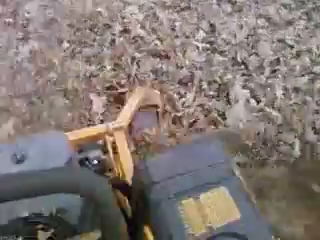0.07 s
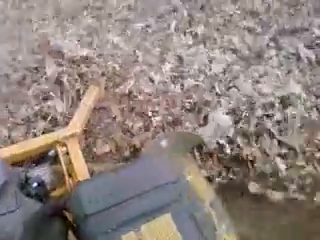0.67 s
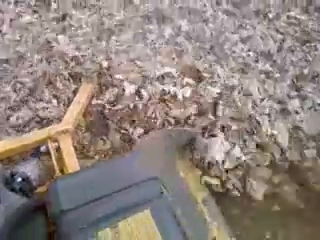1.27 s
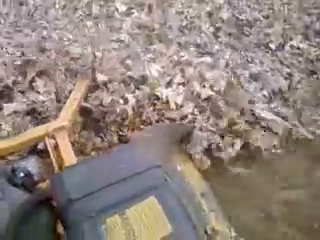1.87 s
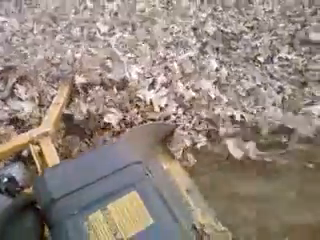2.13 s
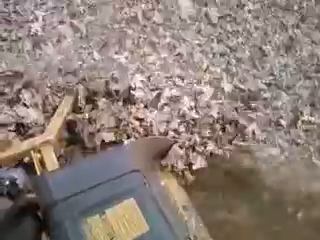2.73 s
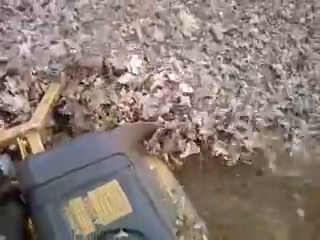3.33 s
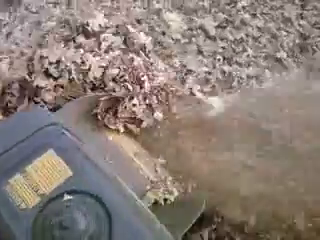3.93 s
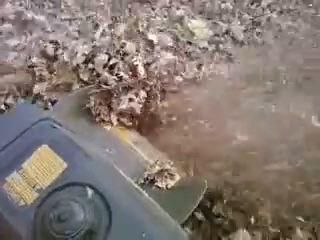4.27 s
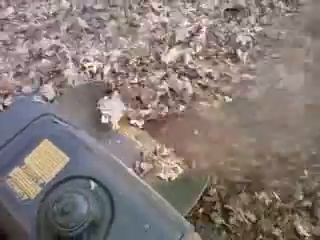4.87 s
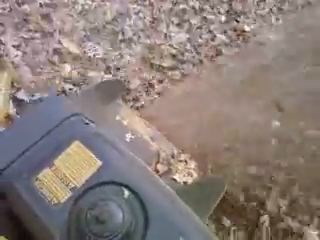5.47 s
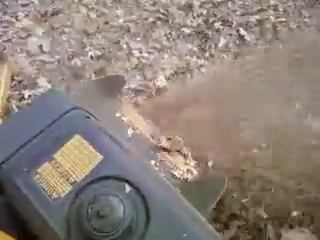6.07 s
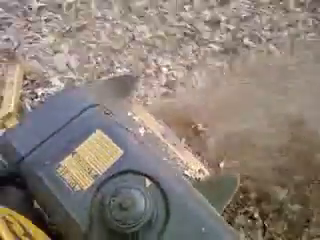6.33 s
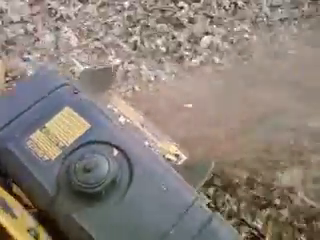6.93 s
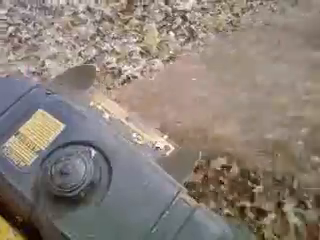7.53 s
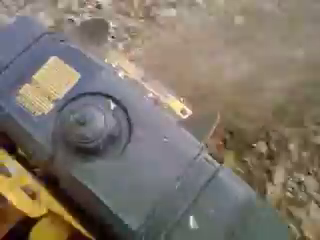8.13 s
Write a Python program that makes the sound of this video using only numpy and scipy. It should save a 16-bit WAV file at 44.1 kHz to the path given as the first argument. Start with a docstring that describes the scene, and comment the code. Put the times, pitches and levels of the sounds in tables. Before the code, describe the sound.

A ride-on mower drones loudly from start to finish, about eight seconds, heard outdoors from the seat. The engine holds an almost constant speed, its throbbing exhaust beating against the low hum of the blades, which slowly swells and fades. A faint, thin fan whine sits above. Air churns under the cutting deck, growing slightly stronger toward the end. Throughout, dry leaves shred in a dense rasp, with a fine rattle of small bits against steel. Twigs give short cracks at irregular moments, clearest near 0.4, 1.8, 3.6, 5.5, 5.9, 6.8 and 7.5 seconds. Light wind puffs rumble faintly on the microphone around 4.5, 7 and 7.8 seconds. The whole sound is close, compressed and a little distorted, with the highest treble missing.

```python
"""A ride-on mower, heard from the seat, drives its three belt-driven blades through dry leaves.
The blades hum at harmonics of their passing rate, beat against the V-twin's exhaust and churn the air.
Torn leaves rasp, twigs and small bits strike the steel deck, a fan whines and a light wind buffets.
The microphone passes only a narrow speech band, and the drone overloads it on nearly every swing."""
import sys
import numpy as np
from scipy import signal
from scipy.fft import rfft, irfft, next_fast_len
from scipy.io import wavfile

SR = 44100
rng = np.random.default_rng(int(sys.argv[2]) if len(sys.argv) > 2 else 0)


def transcribe(u):
    """Save the signal u as a 16-bit wav file named by the first command-line argument.

    u: samples, shape (n,) or (channels, n), limited to [-1, 1]; the rate is SR.
    q: integer samples, one column per channel.
    """
    v = np.clip(np.atleast_2d(u).T, -1, 1)
    q = np.round(v * 32767).astype(np.int16)
    wavfile.write(sys.argv[1], SR, q)


N = 362061
TIME = np.arange(N) / SR

# flow of leaves through the deck: t/s, relative level/dB
LEAF_FLOW = [(0.0, -19.5), (0.48, -21.5), (0.68, -17.2), (0.88, -20), (1.75, -18.5), (1.92, -17.5),
             (2.5, -19.5), (2.95, -20.5), (3.35, -18.5), (3.6, -19.5), (4.3, -20), (5.35, -19.7),
             (5.55, -19), (6.12, -19.5), (6.42, -20.5), (6.72, -20), (7.25, -21.5), (7.85, -20.5)]


def amp(db):
    """Amplitude ratio of a level in decibels."""
    return 10 ** (np.asarray(db) / 20)


def unit(x):
    """Normalisation to rms 1."""
    return x / np.sqrt(np.mean(x ** 2) + 1e-20)


def curves(rows):
    """Linear interpolation of each column of a timed table, at every sample."""
    s, *columns = np.transpose(rows)
    return [np.interp(TIME, s, column) for column in columns]


def colour(x, spectrum):
    """Filtering in the frequency domain by a table of f/Hz, gain/dB."""
    hz, db = np.transpose(spectrum)
    size = next_fast_len(N + SR // 10)
    bins = np.fft.rfftfreq(size, 1 / SR)
    gain = amp(np.interp(np.log(bins + 1), np.log(hz + 1), db))
    return irfft(rfft(x, size) * gain, size)[:N]


def wander(cutoff_hz):
    """Slow random fluctuation: low-passed noise of rms 1."""
    size = next_fast_len(N)
    bins = np.fft.rfftfreq(size, 1 / SR)
    spectrum = rfft(rng.standard_normal(size)) / np.sqrt(1 + (bins / cutoff_hz) ** 4)
    return unit(irfft(spectrum, size)[:N])


def tone(cycles, db):
    """A sinusoid of given rms level that follows a rotation, from a random starting phase."""
    return np.sqrt(2) * amp(db) * np.sin(2 * np.pi * (cycles + rng.random()))


def blades(passes, smear_passes=0.028, eddy_hz=14, third_flutter=0.36):
    """Interference: three blades sweep the deck wall; their hum swells and fades as the spindles slip."""
    # lead over the main spindle from belt slip: t/s, second spindle/passes, third spindle/passes
    belt_slip = [(0.0, -0.9, 0.44), (0.9, -0.91, 0.29), (1.8, -0.685, 0.45), (2.7, -0.15, 0.23),
                 (3.6, 0.06, 0.29), (4.6, 0.185, 0.38), (5.5, 0.61, 0.4), (6.4, 0.955, 0.28),
                 (7.3, 0.94, 0.32), (8.2, 1.49, 0.36)]
    # relative amplitude at the seat: main, second, third spindle
    spindle_gains = (0.99, 0.33, 0.55)
    # hum of one blade: harmonic of the passing rate, level/dB, flutter depth
    hum_harmonics = [(1, -11.5, 0.05), (2, -12, 0.11)]
    # third harmonic: t/s, level/dB
    third_levels = [(0, -24), (1.3, -33), (2.1, -23), (2.4, -23.5), (2.7, -18), (3.15, -15.5), (3.6, -25),
                    (4.3, -19), (4.7, -25), (5.25, -18.5), (5.7, -22.5), (6.25, -16), (6.95, -22),
                    (7.3, -28.5), (8.0, -22)]
    # weak upper tones: harmonic of the passing rate, level/dB
    overtones = [(4, -32.5), (5, -44.5), (6, -40)]
    leads = [0, *curves(belt_slip)]
    hum = np.zeros(N)
    for order, db, flutter in hum_harmonics:
        phasor = sum(gain * np.exp(2j * np.pi * order * (passes + lead))
                     for gain, lead in zip(spindle_gains, leads))
        eddies = 1 + flutter * (wander(eddy_hz) + 1j * wander(eddy_hz))
        hum += (-1) ** order * np.sqrt(2) * amp(db) * (phasor * eddies).real
    third = tone(3 * passes, curves(third_levels)[0])
    upper = sum(tone(order * (passes + smear_passes * wander(4.4)), db) for order, db in overtones)
    return hum + third * (1 + third_flutter * wander(eddy_hz)) + upper


def engine(turns, unevenness=0.15, jitter_turns=0.0028, throb_order=4.5, throb_db=-23.5):
    """Half orders arise as two cylinders fire at unequal intervals; no two firings are quite alike."""
    # exhaust tones: multiple of crankshaft speed, level/dB
    exhaust_orders = [(1.5, -35.5), (2.5, -20.5), (3, -18), (4, -16.5), (5, -24), (6.5, -25), (7, -34.5),
                      (8, -29), (8.5, -31.5), (9.5, -33.5)]
    shaken = turns + jitter_turns * wander(8.9)
    notes = sum(tone(order * shaken, db) for order, db in exhaust_orders)
    # this order lies just above the blades' second harmonic and beats against it
    throb = np.sqrt(2) * amp(throb_db) * np.cos(2 * np.pi * throb_order * shaken)
    return (notes + throb) * (1 + unevenness * wander(33))


def deck_air(passes, clumps, start_db=-14.0, rise_db_per_s=0.26, throb=0.48, gust_db=2.5, clump_db=1):
    """Turbulence under the deck, pulsed by each blade and stirred by clumps, grows as the chute nears."""
    # spectrum of the churning air: f/Hz, relative level/dB
    roar_spectrum = [(40, -29.5), (90, -9.5), (130, -7), (200, -2), (262, 2), (320, -2), (470, -4),
                     (600, -10.5), (800, -14.5), (1200, -17.5), (3500, -30.5)]
    air = rng.standard_normal(N) * (1 + throb * np.cos(2 * np.pi * passes))
    level_db = start_db + rise_db_per_s * TIME + gust_db * wander(12) + clump_db * clumps
    return amp(level_db) * unit(colour(air, roar_spectrum))


def shredding(passes, clumps, gain_db=1.85, chop=0.14, clump_db=0.7, handful_db=0.77,
              snaps_per_s=900, spread_db=3.5, snap_db=-5):
    """Brittle fracture: leaves, fed in handfuls and clumps, tear in a dense rasp with single dry snaps."""
    # spectrum of tearing leaves: f/Hz, relative level/dB
    rasp_spectrum = [(250, -25), (700, -2), (1100, -2.5), (1380, 4), (1600, 0.5), (1900, -1), (2500, -9.5),
                     (2900, -7.5), (3300, -4.5), (3650, -1), (4200, -8)]
    flow_db, = curves(LEAF_FLOW)
    sizes = amp(spread_db * np.minimum(rng.exponential(1, N), 4)) * rng.choice([-1, 1], N)
    snaps = unit(sizes * (rng.random(N) < snaps_per_s / SR))
    tearing = rng.standard_normal(N) + amp(snap_db) * snaps
    feed = amp(clump_db * clumps + handful_db * wander(8.9))
    chopping = 1 + chop * np.cos(2 * np.pi * passes)
    return amp(flow_db + gain_db) * unit(colour(tearing * feed * chopping, rasp_spectrum))


def deck_ring(hz, t60_s):
    """Damped free vibration of a patch of deck with leaves packed against it."""
    t = np.arange(SR // 10) / SR
    return np.sin(2 * np.pi * hz * t) * amp(-60 * t / t60_s)


def twigs(gain_db=-1, ring_t60_s=0.077, ring_db=-6, crack_db=-3, crack_t60_s=0.05,
          band_ratio=1.5, skirt_db=-12):
    """Impact excitation: a twig rings the deck and splinters with a crack centred on the same note."""
    # twigs and stalks striking the deck: t/s, ring f/Hz, relative level/dB
    strikes = [(.431, 630, -3), (1.369, 1910, -13), (1.771, 1350, -7), (2.145, 2010, -11),
               (2.226, 3290, -15), (2.537, 2950, -12.5), (2.56, 1460, -16), (2.857, 1675, -13),
               (3.187, 3270, -11.5), (3.587, 1374, -7), (3.849, 2265, -18), (4.576, 2680, -15),
               (4.851, 3130, -18), (5.484, 3220, -12), (5.542, 1560, -6.5), (5.943, 1560, -7.5),
               (6.1, 2240, -11), (6.724, 3010, -12), (6.782, 550, -8), (7.461, 1304, -4.5),
               (7.921, 2220, -9)]
    out, t = np.zeros(N), np.arange(SR // 10) / SR
    noise = rng.standard_normal(N)
    for s, hz, db in strikes:
        span = slice(round(s * SR), round(s * SR) + len(t))
        band = [(hz / band_ratio, skirt_db), (hz, 0), (hz * band_ratio, skirt_db), (SR / 2, 2 * skirt_db)]
        splinters = unit(colour(noise, band))
        crack = amp(crack_db - 60 * t / crack_t60_s) * splinters[span]
        out[span] += amp(db + gain_db) * (amp(ring_db) * deck_ring(hz, ring_t60_s) + crack)
    return out


def debris(gain_db=-8, hits_per_s=450, spread_db=2.0, t60_s=.013, surge=0.39, modes=36):
    """Random impacts of small bits excite the deck's resonances, more strongly in deep leaves."""
    flow_db, = curves(LEAF_FLOW)
    hits_per_mode = int(hits_per_s * N / SR / modes)
    rattle = np.zeros(N)
    for hz in np.geomspace(700, 3700, modes):
        when, size, sign = rng.random((400, 3))[:hits_per_mode].T
        hits = np.zeros(N)
        hits[(when * N).astype(int)] = np.sign(sign - .5) * amp(spread_db * np.minimum(-np.log(size), 3))
        rattle += signal.oaconvolve(hits, deck_ring(hz, t60_s))[:N]
    return amp(gain_db + flow_db.mean() + surge * (flow_db - flow_db.mean())) * unit(rattle)


def fan(turns):
    """Rotational tones: cooling vanes on the flywheel sing at two high orders of the crankshaft."""
    # fan whine: t/s, level/dB of order 24, level/dB of order 27
    whine_levels = [(0, -33.5, -34.5), (2, -28.5, -45.5), (3.5, -35.5, -48), (4.6, -33, -45),
                    (5.8, -34, -38), (7, -37, -39), (8.21, -32, -28)]
    low_db, high_db = curves(whine_levels)
    return tone(24 * turns, low_db) + tone(27 * turns, high_db)


def wind(breeze_db=-37.5, puff_half_width_s=0.1):
    """Turbulent pressure on the microphone: a light breeze rumbles, with a few short puffs."""
    # puffs of wind: t/s, level/dB
    gusts = [(1.33, -27.5), (4.48, -21), (4.8, -27.5), (7.06, -19), (7.75, -17.5)]
    # spectrum of the buffeting: f/Hz, relative level/dB
    buffet_spectrum = [(10, -23), (25, -10.5), (50, -4.5), (75, 7), (110, 8), (300, -16)]
    puffs = sum(amp(db) * np.exp(-((TIME - s) / puff_half_width_s) ** 2) for s, db in gusts)
    return (amp(breeze_db) + puffs) * unit(colour(rng.standard_normal(N), buffet_spectrum))


def gain_control(x, target_db=-4.5, squeeze=0.79, window_s=0.0092, recovery_db_per_s=220):
    """Compression: the gain drops at once on a loud swing and recovers within a few blade passes."""
    window = signal.windows.hann(2 * int(window_s * SR / 2) + 3)
    power = signal.oaconvolve(x ** 2, window / window.sum(), "same")
    power_db = 10 * np.log10(abs(power) + 1e-9)
    fall_db = recovery_db_per_s * TIME
    held_db = np.maximum.accumulate(power_db + fall_db) - fall_db
    return x * amp(squeeze * (target_db - held_db))


def scene(passes_per_turn=2.2245, in_step_s=4.045):
    """Superposition of all sources at the seat; the crankshaft paces the blades, exhaust and fan."""
    # crankshaft speed, sagging in deep leaves: t/s, rotation f/Hz
    crank_speed = [(0.0, 55.94), (0.75, 55.11), (1.3, 55.4), (2.5, 55.21), (3.05, 55.34), (3.75, 54.67),
                   (4.6, 55.28), (5.3, 55.49), (5.8, 55.26), (6.6, 55.53), (7.1, 55.19), (7.6, 55.61),
                   (8.2, 55.02)]
    crank_hz, = curves(crank_speed)
    turns = np.cumsum(crank_hz) / SR
    turns -= np.interp(in_step_s, TIME, turns)  # zero when exhaust and main blade are in phase
    passes = passes_per_turn * turns
    clumps = wander(47)
    drone = engine(turns) + fan(turns) + blades(passes) + deck_air(passes, clumps)
    return (drone + shredding(passes, clumps) + debris() + twigs() + wind())[None]


def record(dry, drive_db=0.4, ceiling=.709, hiss_db=-61, cutoff_hz=15830):
    """Overload distortion: band-limited, compressed sound clips and crackles above the band, over hiss."""
    # upper edge of the microphone's speech band: f/Hz, gain/dB
    microphone_response = [(3250, 1.5), (3500, -4), (3750, -9.5), (4000, -9), (4250, -13.5), (4600, -44.5),
                           (5200, -67)]
    # bass cut ahead of the converter: f/Hz, gain/dB
    bass_cut = [(15, -19), (40, -15), (65, 0)]
    levelled = gain_control(colour(dry[0], microphone_response))
    clipped = np.clip(amp(drive_db) * colour(levelled, bass_cut), -ceiling, ceiling)
    hiss = amp(hiss_db) * unit(colour(rng.standard_normal(N), [(4000, -1.0), (16000, -7.5)]))
    low_pass = signal.firwin(511, cutoff_hz, window=("kaiser", 9), fs=SR)
    return signal.oaconvolve(clipped + hiss, low_pass, "same")[None]


dry = scene()
out = record(dry)
transcribe(out)
```